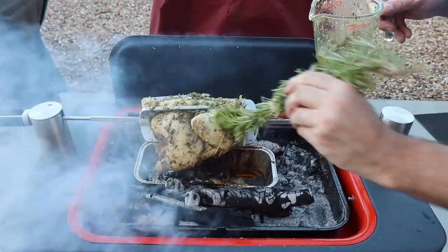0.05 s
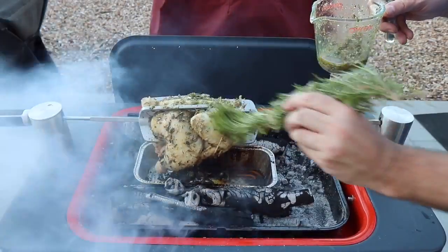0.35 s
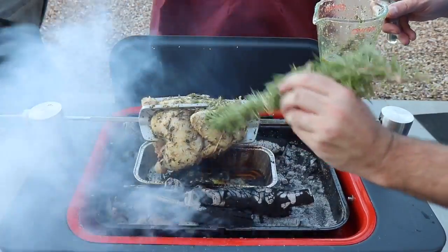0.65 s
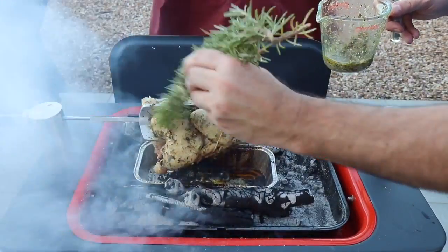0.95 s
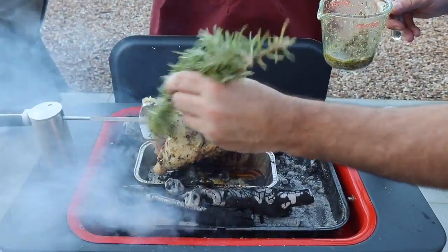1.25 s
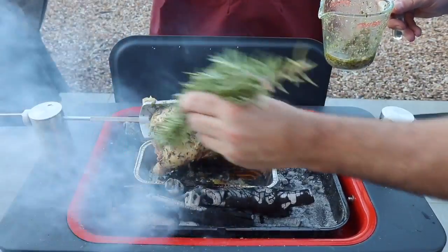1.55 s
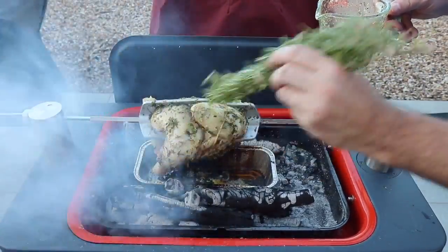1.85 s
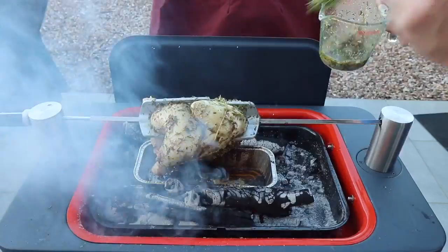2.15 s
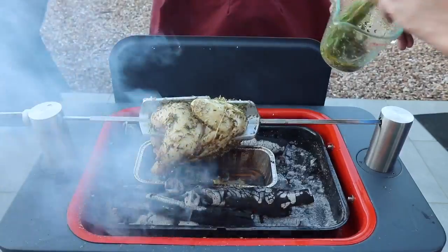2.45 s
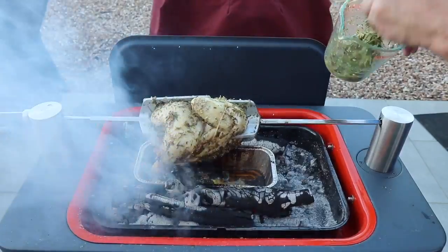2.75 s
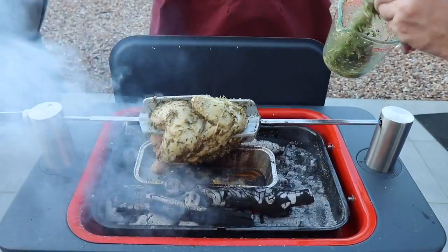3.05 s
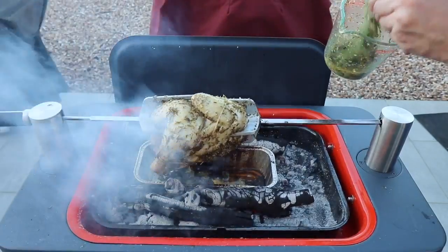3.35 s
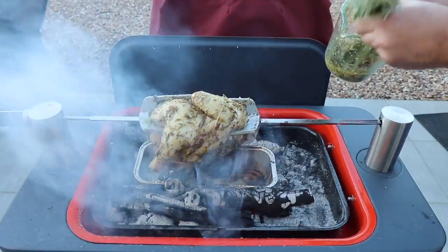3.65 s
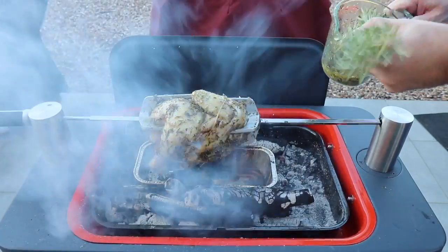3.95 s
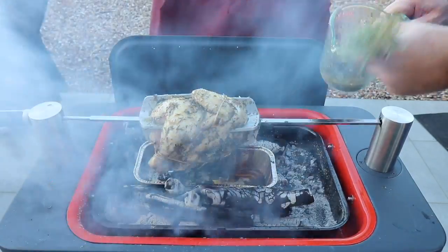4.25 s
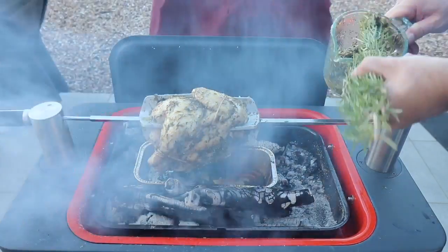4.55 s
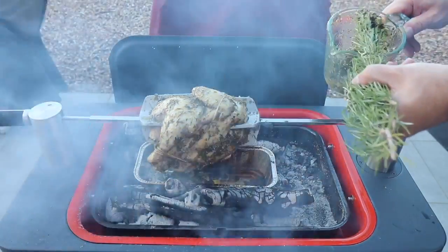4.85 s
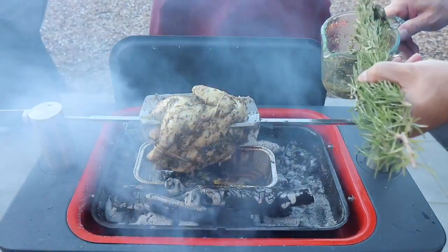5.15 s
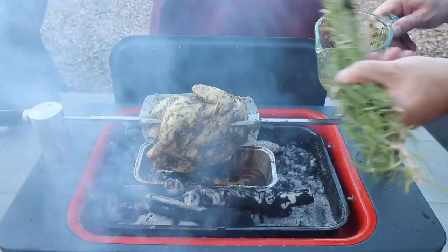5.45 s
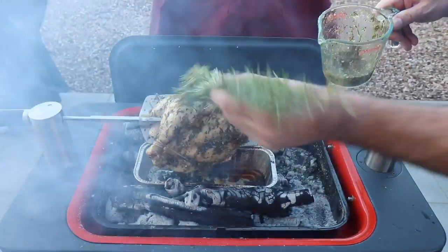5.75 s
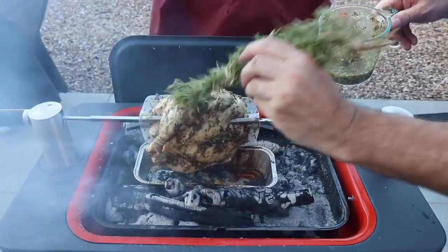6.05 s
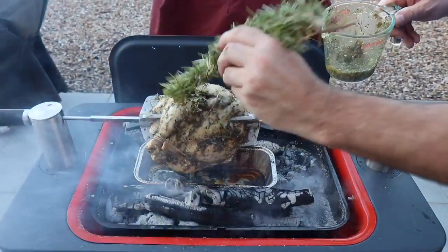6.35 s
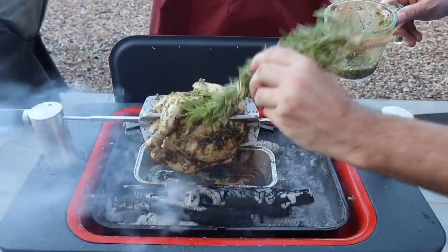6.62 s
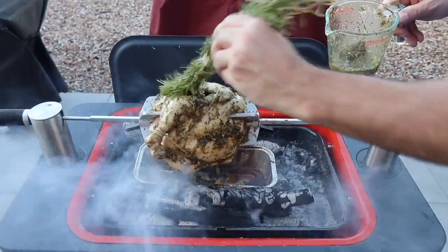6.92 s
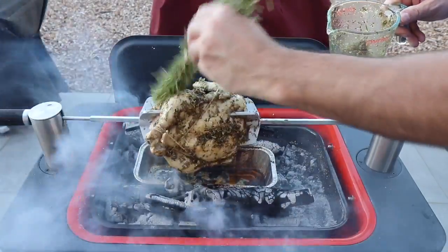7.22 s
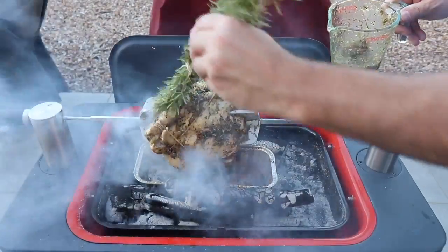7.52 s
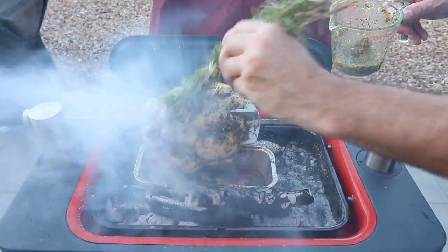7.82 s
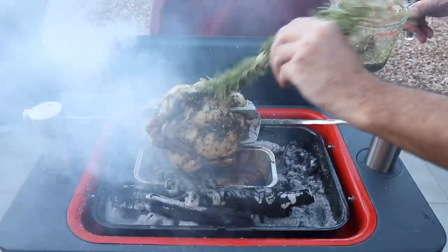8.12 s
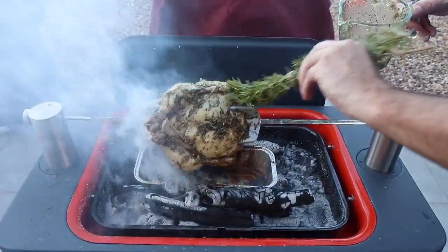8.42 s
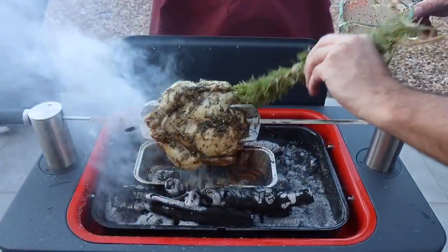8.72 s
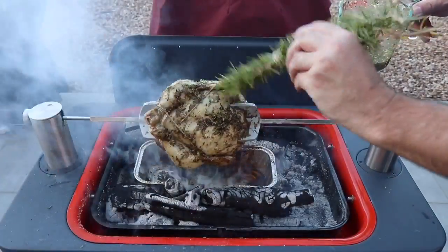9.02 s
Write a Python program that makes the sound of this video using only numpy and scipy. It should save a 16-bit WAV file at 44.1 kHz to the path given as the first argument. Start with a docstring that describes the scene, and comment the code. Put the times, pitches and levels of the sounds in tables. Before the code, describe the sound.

Marinade sizzles on hot charcoal beneath a roasting chicken, heard from close above an outdoor grill. A bright, fine fizz sits over a duller crackle that rings slightly in the grill bowl. It is loudest in the first second and a half, surging as drips land, with sharp snaps of fat at about 0.2, 1 and 1.4 seconds. The sizzle then eases, with a few snaps and short hisses of steam between 3 and 4 seconds, and is quietest around 4.5 to 5 seconds. Tiny ember tinks and faint singing steam come now and then. From about 5.5 seconds the sizzle builds again, with a sharp snap near 7. A quick run of snaps between 8 and 8.7 seconds leads to one clear charcoal tink at 8.9 as the fizz dies down. A faint spit motor hum and low open-air rumble continue throughout.

```python
"""A chicken turns on a spit over charcoal in the open air, and the motor hums faintly throughout.
First, marinade drips on the embers and boils off in thousands of tiny bursts a second: a bright fizz,
and a duller crackle that rings in the grill bowl. Fat snaps, steam sings and the coals tink.
The coals dry while a bunch of herbs is dipped; after five seconds, basting builds the sizzle again.
Near the end comes a quick run of snaps and one clear tink as the fizz dies down."""
import sys
import numpy as np
from scipy import signal
from scipy.fft import rfft, irfft
from scipy.io import wavfile

SR = 44100
rng = np.random.default_rng(int(sys.argv[2]) if len(sys.argv) > 2 else 0)


def transcribe(signal):
    """Save signal, clipped to [-1, 1], as a 16-bit WAV file at the path in sys.argv[1]."""
    frames = np.atleast_2d(signal).T
    limited = np.clip(frames, -1, 1)
    pcm = np.round(limited * 32767).astype(np.int16)
    wavfile.write(sys.argv[1], SR, pcm)


N = 409248
TIME = np.arange(N) / SR


def from_db(db):
    """Turn decibels into a number to multiply by."""
    return 10 ** (np.asarray(db) / 20)


def rms_one(x):
    """Scale a sound to an average power of 1."""
    return x / np.sqrt(np.mean(x ** 2) + 1e-20)


def in_time(rows):
    """Join timed rows with straight lines, giving one curve per value column."""
    s, *columns = np.transpose(rows)
    return [np.interp(TIME, s, c) for c in columns]


def add(out, s, sound):
    """Mix a short sound in at s seconds."""
    room = out[round(s * SR):][:len(sound)]
    room += sound[:len(room)]


def drift(hz):
    """A smooth random wander, typically of size 1."""
    step = 40  # samples between points
    r = np.exp(-2 * np.pi * hz * step / SR)
    noise = rng.standard_normal(N // step + 2002)
    slow = signal.lfilter([1], [1, -2 * r, r * r], noise)[2000:]
    return np.interp(np.arange(N) / step, np.arange(len(slow)), rms_one(slow))


def colour(x, spectrum, size=4096):
    """Make each frequency as strong as a table says."""
    hz, db = np.transpose(spectrum)
    grid = np.maximum(np.arange(size // 2 + 1) * SR / size, 1)
    gains = from_db(np.interp(np.log(grid), np.log(hz), db))
    # minimum phase: the filter rings after a click, never before
    cepstrum = irfft(np.log(gains))
    cepstrum[1:size // 2] *= 2
    cepstrum[size // 2 + 1:] = 0
    return signal.oaconvolve(x, irfft(np.exp(rfft(cepstrum))))[:N]


def band(x, low_hz, high_hz):
    """Gently turn down what lies outside two frequencies."""
    return signal.sosfilt(signal.butter(2, [low_hz, high_hz], "band", fs=SR, output="sos"), x + 1e-18)


def resonance(x, hz, width_hz):
    """Let through the sound near one pitch."""
    r = np.exp(-np.pi * width_hz / SR)
    feedback = [1, -2 * r * np.cos(2 * np.pi * hz / SR), r * r]
    return signal.lfilter(np.array([1, 0, -1]) * (1 - r * r) / 2, feedback, x + 1e-18)


def ring(since, hz, fade_s):
    """A struck tone that falls 60 dB in fade_s seconds."""
    return np.sin(2 * np.pi * hz * since) * from_db(-60 * since / fade_s)


def bursts(per_s, spread_db, limit_db):
    """Bubbles burst as random clicks, many small and a few large."""
    born = rng.random(N) < per_s / SR
    sizes = from_db(np.minimum(spread_db * rng.exponential(1, N), limit_db))
    return rms_one(born * sizes * rng.choice([-1, 1], N) / np.sqrt(per_s))


# The tone of the open air. Each row: frequency in Hz, relative level in dB.
AIR_TONE = [(25, -6), (45, 4.5), (65, 0), (100, 5.5), (170, 0), (400, -15.5), (1000, -13), (4000, -18.5)]

def background(air_db=-59.5, motor_db=-67):
    """The open air rumbles and the spit motor hums unsteadily."""
    air = colour(rng.standard_normal(N), AIR_TONE)
    air = rms_one(signal.sosfilt(signal.butter(6, 36, "high", fs=SR, output="sos"), air))
    motor = rms_one(resonance(rng.standard_normal(N), hz=88.8, width_hz=6))
    return from_db(air_db) * air + from_db(motor_db) * motor


# Embers cracking. Each row: start in seconds, level in dB, pitch in Hz.
EMBER_CRACKS = [(.948, -18, 4300), (2.460, -20, 4100), (2.753, -21, 4100), (3.285, -20, 4150),
                (5.330, -21, 3500), (6.119, -20, 4100), (8.726, -20, 3300), (8.920, -5, 4150)]
# The tones of one ember. Each row: multiple of its pitch, relative level in dB, seconds to fall 60 dB.
EMBER_TONES = [(1, 0, .011), (.7, -8, .007), (1.15, -9, .007), (2.1, -17, .004)]

def ember_tinks(attack_s=.0004):
    """Suddenly cooled charcoal cracks and rings for a few milliseconds."""
    out, since = np.zeros(N), np.arange(SR // 20) / SR
    for s, db, hz in EMBER_CRACKS:
        tones = sum(from_db(tone_db) * ring(since, hz * ratio, fade_s)
                    for ratio, tone_db, fade_s in EMBER_TONES)
        add(out, s, from_db(db) * tones * (1 - np.exp(-since / attack_s)))
    return out


# Droplets flashing into steam. Each row: start in seconds, level in dB, length in seconds, pitch in Hz.
STEAM_FLASHES = [(0.861, -18, .014, 14500), (0.907, -29.5, .085, 4300), (3.31, -33, 0.099, 14500),
                 (3.604, -34, 0.22, 15300), (4.343, -35.5, .008, 2470), (5.565, -41.5, 0.083, 1930),
                 (5.724, -35, .04, 2700), (8.046, -24.5, .022, 11500), (8.28, -29, 0.011, 3200),
                 (8.493, -23, 0.025, 14800)]
# Steam singing between coals. Each row: start in seconds, level in dB, pitch in Hz.
STEAM_VENTS = [(.2, -43, 2760), (1.8, -46.5, 4920), (3.38, -50, 2510), (3.8, -48, 3920), (4.55, -48, 3290)]

def steam_flares(vent_s=.59, vent_width_hz=170, rise_share=.13):
    """A droplet on a hot spot boils away in one short hiss; steam in a narrow gap sings for longer."""
    out, grains = np.zeros(N), bursts(5500, spread_db=3, limit_db=18)
    # low flashes cover a narrower range of frequencies
    flashes = [(s, db, length, hz, min(3100, hz / 1.8)) for s, db, length, hz in STEAM_FLASHES]
    vents = [(s, db, vent_s, hz, vent_width_hz) for s, db, hz in STEAM_VENTS]
    for s, db, length, hz, width_hz in flashes + vents:
        swell = np.sqrt(np.interp(TIME, [s, s + length * rise_share, s + length], [0, 1, 0]))
        out += from_db(db) * swell * rms_one(resonance(grains, hz, width_hz))
    return out


# Fat spitting. Each row: start in seconds, relative crack level in dB, relative thud level in dB.
FAT_SPITS = [(.1937, 5.5, -10.5), (.868, -4, -18), (1.003, -5, -27), (1.0067, -3, -25), (1.4291, -2, -13),
             (3.211, 2, -21), (3.363, -4.5, -20), (4.331, -9, -23), (5.277, -7, -30), (6.9243, 2, -11),
             (8.057, -6, -28), (8.2838, 1, -21), (8.460, -5, -21), (8.496, -4, -22), (8.5505, -4, -21),
             (8.659, -10, -20), (8.715, -13, -20), (9.044, -15, -22)]

def fat_snaps(small_per_s=1.8, crack_hz=12800, thud_hz=2200, echo_s=.00038, echo_db=-10):
    """A bead of fat explodes: one thud of pressure, and a bright crack that echoes off nearby coals."""
    cracks, thuds, since = np.zeros(N), np.zeros(N), np.arange(SR // 100) / SR
    # extra small spits, random in time and size
    draws = rng.uniform([0, -1], [1, 1], (round(small_per_s * N / SR), 2))
    small = [(when * N / SR, -11 + 3 * size, -28 + 3 * size) for when, size in draws]
    for s, crack_db, thud_db in FAT_SPITS + small:
        crack = from_db(crack_db) * ring(since, crack_hz * rng.uniform(.94, 1.06), fade_s=.0007)
        add(cracks, s, crack)
        add(cracks, s + echo_s * rng.uniform(.57, 1), from_db(echo_db) * crack)
        add(thuds, s, from_db(thud_db) * np.exp(-2 * np.pi * thud_hz * since))
    # so small a source gives off no deep bass
    return band(cracks, 5000, 18600) + from_db(3.5) * band(thuds, 90, 3200)


# Drips landing. Each row: start in seconds, relative peak fizz in dB, seconds to reach that peak.
MARINADE_DRIPS = [(.34, -22, .1), (.84, -23.5, .085), (1.46, -25.7, 0.1), (2.27, -32, .08),
                  (3.569, -30, 0.085), (3.78, -31.5, 0.13), (4.53, -34.5, .08), (6.14, -33, 0.045),
                  (6.35, -31.5, 0.1), (6.88, -34, 0.22), (7.88, -32.4, .38)]

def drip_power():
    """Each drip spreads, boils hardest, then dries away; their powers add up."""
    power = 1e-12
    for s, db, rise_s in MARINADE_DRIPS:
        age = np.maximum(TIME - s, 0) / rise_s
        power += (from_db(db) * age * np.exp(1 - age)) ** 2
    return power


# Marinade standing on the coals. Each row: time in seconds, relative fizz level in dB.
SURFACE_BOIL = [(0, -23), (1.71, -29), (3.12, -29.5), (3.5, -32.5), (4.47, -36), (5.5, -31), (5.8, -26.5),
                (8.6, -31), (9.28, -33.5)]
# Marinade deeper in the embers. Each row: time in seconds, relative crackle and sputter levels in dB.
DEEP_BOIL = [(0, -34.5, -49.5), (1.25, -39.5, -51.5), (3.0, -40, -52.5), (4.35, -42.5, -50.5),
             (5.2, -39.5, -52), (5.62, -35, -49.5), (7.7, -38, -50.5), (8.8, -38, -50), (9.28, -40.5, -53)]

def boil_levels(drip_crackle_db=-15, drip_sputter_db=-29):
    """Fizz, crackle and sputter levels in dB: fresh drips add to what is already boiling."""
    fresh = drip_power()
    layers = zip(in_time(SURFACE_BOIL) + in_time(DEEP_BOIL), (0, drip_crackle_db, drip_sputter_db))
    return [10 * np.log10(from_db(steady_db) ** 2 + from_db(share_db) ** 2 * fresh)
            for steady_db, share_db in layers]


def spurts(per_s, decay_s):
    """A film of liquid breaks, so the bubbling jumps up at once and dies away."""
    kicks = (rng.random(N) < per_s / SR) * rng.uniform(.55, 1, N)
    swell = signal.lfilter([1], [1, -np.exp(-1 / (decay_s * SR))], kicks + 1e-18)
    return rms_one(swell - swell.mean())


def ringing_bubbles(clicks, low_hz, high_hz, width_hz, count):
    """Each burst rings briefly at one of several pitches, picked at random."""
    picks = rng.integers(0, count, N)
    pitches = np.linspace(low_hz, high_hz, count)
    return rms_one(sum(resonance(clicks * (picks == k), hz, width_hz) for k, hz in enumerate(pitches)))


def coal_echoes(x, echo_db=-23, hold_s=.433, count=4):
    """The coals throw back faint, quick echoes, whose paths change as new spots get wet."""
    out, hop = x.copy(), int(hold_s * SR)
    fade = np.sin(np.pi * np.arange(2 * hop) / (2 * hop))
    for start in range(0, N - hop, hop):
        part = x[start:start + 2 * hop]
        for lag_s, sign in zip(rng.uniform(.0002, .0025, count), rng.choice([-1, 1], count)):
            add(out, start / SR + lag_s, sign * from_db(echo_db) * part * fade[:len(part)])
    return rms_one(out)


# The air ringing in the grill bowl. Each row: pitch in Hz, width in Hz, relative level in dB
# from the first wet patch of coals, and the same from the second.
BOWL_TONES = [(1808, 254, -9, -3), (2130, 255, -5, -2), (2570, 242, 0.5, -2.5), (2894, 283, 1, -1),
              (3320, 367, -1, -2), (4000, 294, 0, -0.5), (4650, 430, -2, -1.5), (4976, 316, 1, -1),
              (6220, 1360, -6.5, -4)]

def grill_bowl(x, position):
    """Each patch of coals stirs its own mix of the bowl's tones."""
    first, second = 0, 0
    for k, (hz, width_hz, first_db, second_db) in enumerate(BOWL_TONES):
        tone = (-1) ** k * resonance(x, hz, width_hz)
        first += from_db(first_db) * tone
        second += from_db(second_db) * tone
    return rms_one((1 - position) * rms_one(first) + position * rms_one(second))


# The fizz of wet coals and of drying ones. Each row: frequency in Hz, relative level in dB.
WET_TONE = [(100, -22.5), (1500, -19), (5500, -19), (6500, -12.5), (7800, -5.5), (9500, -2), (10700, 1.5),
            (12600, 3), (14000, 1), (15800, -5)]
DRY_TONE = [(100, -20.5), (1500, -19.5), (5500, -20), (6500, -7), (7800, -3.5), (9500, -2), (10700, 0.6),
            (12600, 1), (14000, 0.5), (15800, -4)]

def surface_fizz(spray, fizz_db, position, wet_from_db=-35, wet_range_db=9.5, second_drier_db=5.5):
    """The fizz sounds wetter as its level rises; the second patch of coals is drier."""
    wetness = np.clip((fizz_db - wet_from_db - second_drier_db * position) / wet_range_db, 0, 1)
    return wetness * rms_one(colour(spray, WET_TONE)) + (1 - wetness) * rms_one(colour(spray, DRY_TONE))


# Where the liquid boils. Each row: time in seconds, position from 0 (first patch) to 1 (second).
BOIL_POSITION = [(0, 0), (2.2, 0.17), (3.8, 0.5), (4.6, 1), (6.4, 0.7), (7.8, 0.65), (9.28, 0.63)]
# The tone of the low sputter. Each row: frequency in Hz, relative level in dB.
SPUTTER_TONE = [(60, -11), (150, -2), (300, -1), (500, 2.5), (750, -1.5), (970, 3.5), (1150, -1.5),
                (1450, -2), (2500, -5), (8000, -29)]

def sizzle():
    """Harder boiling gives more bursts a second, in clumps as the liquid skitters over the coals."""
    fizz_db, crackle_db, sputter_db = boil_levels()
    position, = in_time(BOIL_POSITION)
    clumps = spurts(per_s=150, decay_s=.0028)
    per_s = 5500 * from_db(.7 * (fizz_db - np.mean(fizz_db)))
    fine = bursts(per_s, spread_db=3, limit_db=19)
    coarse = bursts(per_s * .55, spread_db=2.5, limit_db=8.5)
    steam = rng.standard_normal(N)
    # the smallest bubbles tick, slightly larger ones ring, and escaping steam fills the gaps
    top_pops = bursts(per_s * .5, spread_db=.5, limit_db=19)
    top_rings = ringing_bubbles(top_pops, 7150, 15700, width_hz=1130, count=9)
    spray = (fine + .68 * top_rings + .38 * steam) * from_db(clumps + .5 * drift(hz=5.4))
    fizz = surface_fizz(coal_echoes(spray), fizz_db, position)
    # bubbles down between the coals sound through the bowl
    deep_pops = bursts(per_s * .2, spread_db=1, limit_db=17.5)
    deep_rings = ringing_bubbles(deep_pops, 1740, 5410, width_hz=340, count=10)
    bubbling = coarse + .72 * fine + .49 * deep_rings + .24 * steam
    crackle = grill_bowl(bubbling * from_db(1.14 * clumps + .9 * drift(hz=9.7)), position)
    splutter = (fine + .68 * coarse + .47 * steam) * from_db(1.83 * clumps)
    sputter = rms_one(colour(splutter, SPUTTER_TONE))
    boiling = from_db(fizz_db + 1.25) * fizz + from_db(crackle_db + .6) * crackle
    boiling += from_db(sputter_db) * sputter
    return signal.sosfilt(signal.butter(2, 60, "high", fs=SR, output="sos"), boiling)


def scene():
    """The grill in one channel, heard from close above."""
    return (sizzle() + fat_snaps() + steam_flares() + ember_tinks() + background())[None]


def record(dry, cutoff_hz=15780):
    """Round off the tallest peaks and cut away the very highest treble."""
    rounded = dry / (1 + dry ** 6) ** (1 / 6)
    treble_cut = signal.firwin(601, cutoff_hz, fs=SR, window="blackman")
    return signal.oaconvolve(rounded, treble_cut[None], mode="same", axes=1)


dry = scene()
out = record(dry)
transcribe(out)
```